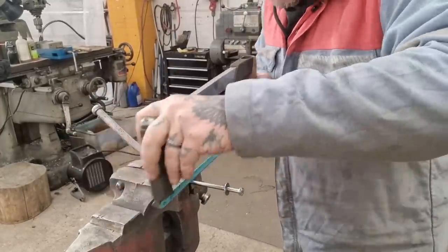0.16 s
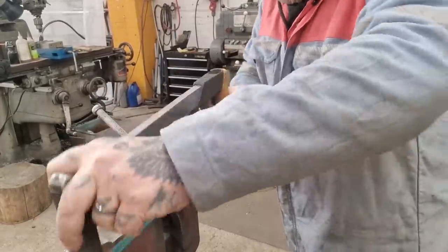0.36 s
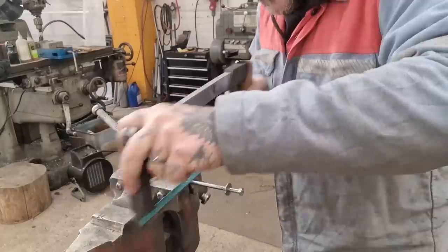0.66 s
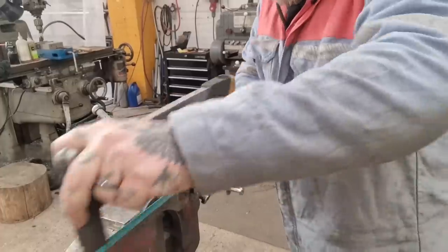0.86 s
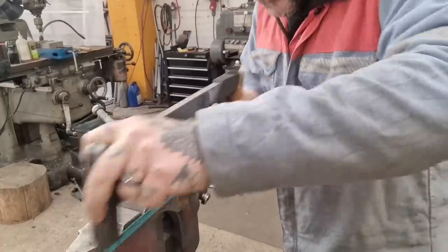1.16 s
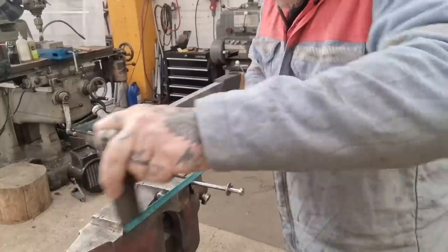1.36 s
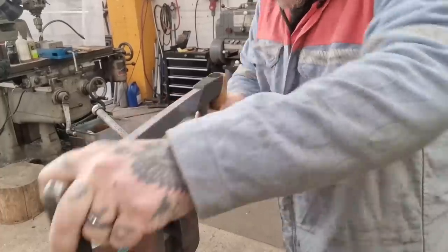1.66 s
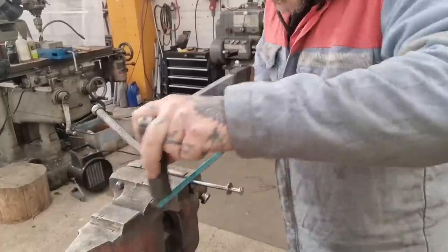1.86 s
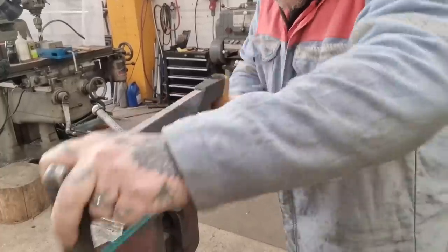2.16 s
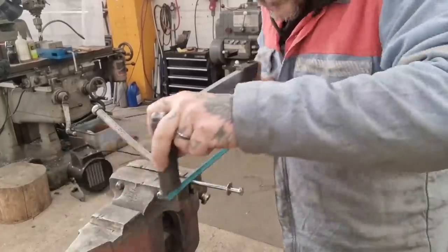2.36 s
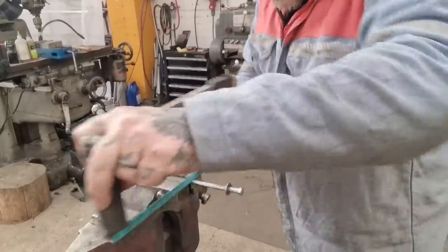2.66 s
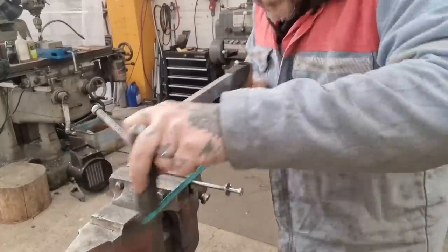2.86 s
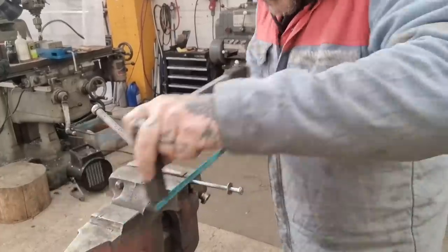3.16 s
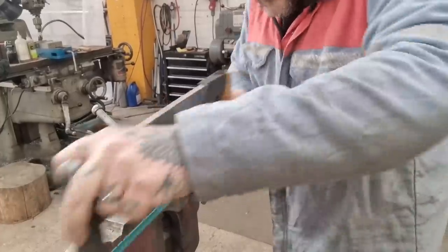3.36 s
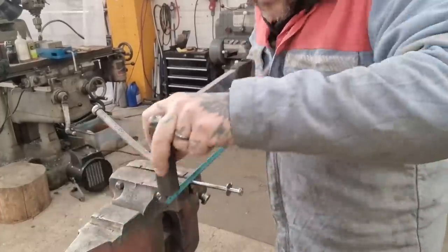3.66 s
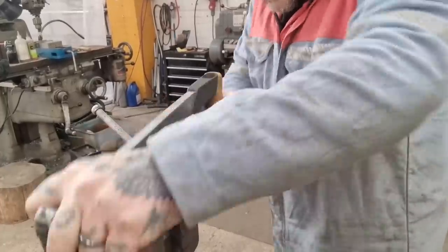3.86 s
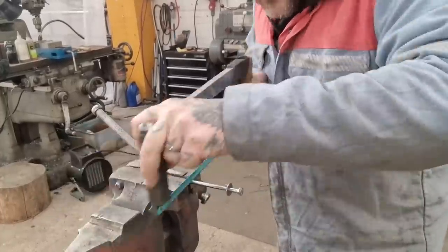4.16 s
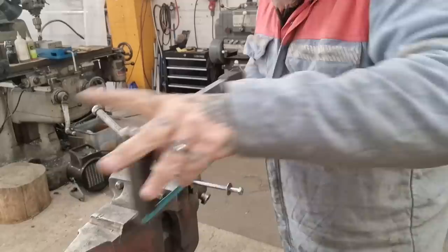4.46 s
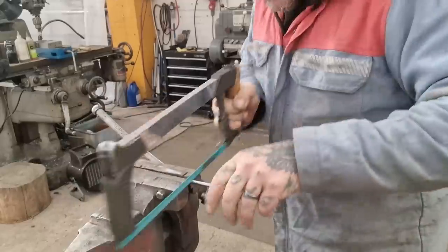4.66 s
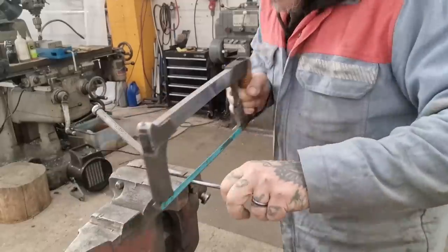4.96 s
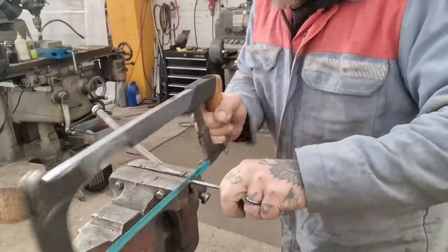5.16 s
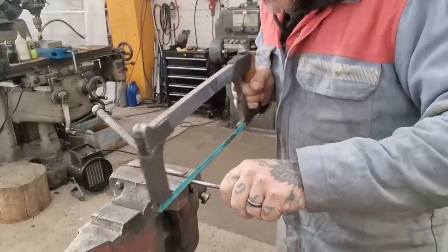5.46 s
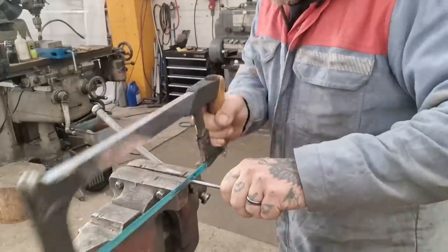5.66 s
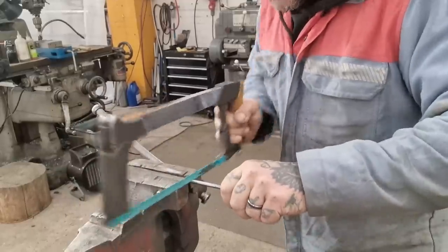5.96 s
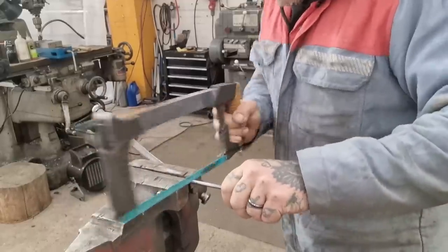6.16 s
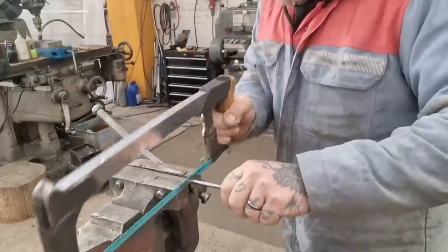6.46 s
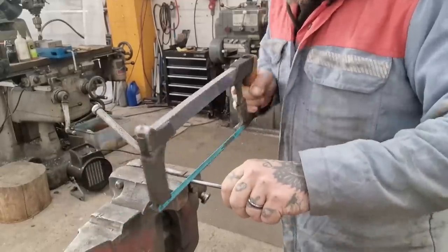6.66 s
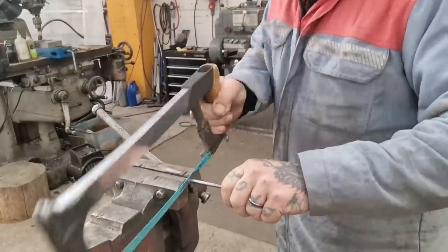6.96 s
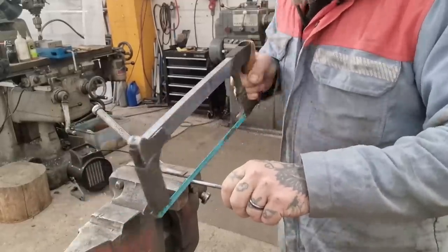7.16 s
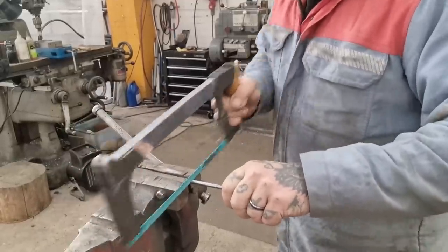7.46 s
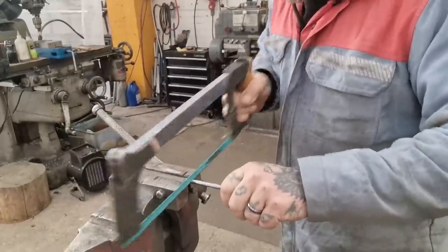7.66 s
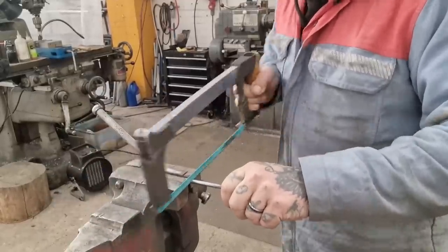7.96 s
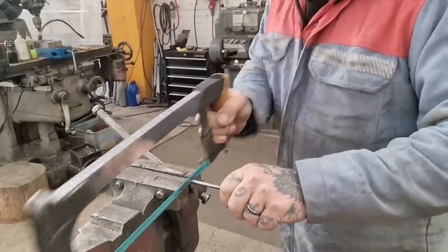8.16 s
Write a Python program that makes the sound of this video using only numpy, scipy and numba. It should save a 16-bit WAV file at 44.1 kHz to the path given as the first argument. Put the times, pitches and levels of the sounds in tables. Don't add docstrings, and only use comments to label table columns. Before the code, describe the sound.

A hacksaw is already cutting a thin metal bolt in a bench vise, heard in stereo from an arm's length in a fairly dry workshop with faint low rumble and wandering hum. From 0 to 4.5 seconds, strong pushes come roughly every 0.43 seconds, each swelling into gritty grinding and a loud buzzing ring near 1.5 kilohertz that bends upward under pressure. Softer, raspy pulls fill between them, some with a low blade flutter. A short vise hum colours the push around 0.7; tooth tone becomes clearer from about 1.9. After 4.5 the ringing grows uneven, with high metallic flares near 4.7 and 5.2 quickly damped, and a rougher scraping edge. Snags bite sharply around 6.4, 7.3, 7.7 and 8.1. Brief high squeals sound near 6.85, 7.25 (strongest) and 7.7. Sawing continues to the end, about 8.3.

```python
import sys
import numpy as np
from scipy import signal
from scipy.fft import rfft, irfft
from scipy.io import wavfile
from scipy.ndimage import uniform_filter1d, minimum_filter1d
from numba import njit

SR = 44100
rng = np.random.default_rng(int(sys.argv[2]) if len(sys.argv) > 2 else 0)


def level_to_linear(level):
    exponent = np.asarray(level, float) / 20
    return 10 ** exponent


def unload_wav(signal):
    wavfile.write(
        sys.argv[1],
        SR,
        np.round(np.clip(np.atleast_2d(signal).T, -1, 1) * 32767).astype(np.int16),
    )


N = 366471

# start t/s, share of stroke at full pressure, grind level/dB, bolt ring level/dB, stiffening f/Hz
PUSHES = [(.147, 0.42, -21.5, -11.5, 53.7), (.601, 0.51, -21, -12.5, 70), (1.038, 0.53, -24.5, -14, 81.7),
          (1.453, 0.6, -24, -14.5, 81), (1.932, .45, -20.5, -15, 93), (2.371, 0.47, -19.5, -15.5, 96),
          (2.815, .45, -21, -15, 89.4), (3.245, 0.41, -22, -14.5, 80), (3.681, 0.41, -23.5, -15.5, 79),
          (4.132, 0.41, -24, -14, 78), (4.574, 0.4793, -26.5, -28, 30), (5.018, 0.44, -24, -12.5, 50),
          (5.45, 0.44, -27, -21.5, 10.47), (5.872, 0.49, -24, -16, 91), (6.301, 0.52, -25, -14.5, 60),
          (6.72, 0.33, -22.5, -14.5, 8.9), (7.166, 0.45, -24, -25.5, 8.9), (7.6, 0.45, -25, -14.5, 35.4),
          (8.027, .51, -24, -13.5, 9.1)]
# start t/s, share of stroke where the bolt rings most, grind level/dB, ring level/dB, flap level/dB
PULLS = [(-.06, 0.44, -29.5, -25.5, -53), (0.393, 0.56, -30, -25.5, -38.5), (.835, .4, -33, -22.5, -31),
         (1.291, 1, -29.5, -23, -27.5), (1.743, 0.61, -30, -21.5, -36), (2.184, 0.6, -31.5, -22, -50),
         (2.608, .5, -36, -21.5, -53), (3.043, 0.55, -31, -21.5, -31.5), (3.488, 0.69, -33.5, -22, -44),
         (3.944, 0.62, -31, -22.5, -30.5), (4.38, .46, -36.5, -20, -48), (4.833, .2, -37.5, -21.5, -56),
         (5.264, 0.84, -34, -32.5, -58), (5.672, .6, -31.5, -24, -38), (6.104, 0.25, -34.5, -24.5, -67),
         (6.528, 0.68, -29.5, -15.5, -57), (6.985, 0.23, -36, -23, -39), (7.404, 0.59, -32, -21.5, -29.5),
         (7.841, 0.48, -35.5, -34, -41.5), (8.27, 0.31, -24.5, -22, -50)]
LAST_S = 8.48
HAND_MOVES_S = 4.5

TOOTH_HZ = [(1340, 1000), (1240, 980)]
TOOTH_DB = [(-14, -14.5), (-20, -14.5)]
UPPER_DB = [(-0.5, -1), (-15.5, -32)]
RUB_DB = [(-64, -7), (-5, -3)]
EDGE_DB = [(-7, -26), (-7.5, -29)]
KNOT_DB = [(1.5, 3), (4.5, 4.7)]
SET_OFF_S = [(.02, .001), (.018, .001)]
TURN_GRIND_DB = [(-50.5, -52.5), (-59.5, -59)]
TURN_RING_DB = [(-42.5, -36), (-44, -41.5)]
GRIND_BLUNT = [(1.11, 1.6), (1.27, 1.74)]
GRIND_DROP_BLUNT = [(1.17, 1.22), (0.82, 1.4)]
RING_BLUNT = [(1.02, 0.7), (0.63, 0.75)]
RING_DROP_BLUNT = [(1.01, 1), (0.43, 0.49)]
GRIND_HOLD = [(.05, 0.05), (.2, 0.32)]
RING_HOLD = [(.15, 0.066), (.3, 0.024)]
RING_DROP_HOLD = [(.2, 0.046), (.33, .08)]
FLAP_HZ = [(202.2, 182), (171.3, 165)]
FLAP_TOP = [(0.552, .68), (0.525, 0.2523)]

PULL_TOP = [0.56, 0.4]
STIFFEN_LEAD = [.17, -0.02056]
FLAP_PUSH_DB = [-38, -47.5]

# f/Hz, level/dB per Hz
SHOP = [(20, -39), (45, -52), (70, 7.5), (100, -5), (160, 3.5), (250, -16), (700, -20), (2000, -19.5),
        (6000, -29), (16000, -60)]
# f/Hz, level/dB per Hz
GRIND = [(200, -37.5), (500, -11), (1200, -1.5), (2500, 1), (4800, 1.5), (6600, 2), (7600, 5.5),
         (10300, -5), (12000, -8), (14000, 0), (15800, -10)]
TOOTH_OVER = [-11.5, 0, -13, -21]
# t/s, level/dB
CLEAR = [
    (0, -10),
    (1.6, -11),
    (1.85, 0),
    (5.6, 0),
    (8.31, -13),
]
# f/Hz, width/Hz, level/dB
VISE = [(780, 22, 9.5), (992, 42.6, 12), (1920, 40, -2.5), (2165, 23, 1), (5780, 40, 15.5), (342, 5.7, 31)]
# t/s, f/Hz
REST = [(0, 1469), (4.4, 1433), (6.5, 1413), (8.31, 1387)]
# f/Hz, width/Hz, level/dB, stiffening
UPPER = [(4287, 22, 1, 1.194), (4386, 36, -6, 2), (8560, 110, 2.5, 1.26), (7340, 59, -9, 0.31),
         (14080, 200, 6, 0.3), (13260, 110, -7, 0.1), ]
# t/s, level/dB
HELD = [
    (0, -3),
    (4.5, -1.5),
    (4.66, 1),
    (4.7, 23),
    (4.735, -9),
    (5.1, -5),
    (5.17, 22),
    (5.3, -18),
    (8.31, 1.5),
]
CHATTER_DB = [-9, -11.5]
# t/s, level/dB
BITES = [(0.406, -29), (0.642, -29), (2.8511, -21.5), (3.0602, -34), (3.271, -46), (3.2936, -44),
         (3.697, -42), (3.9507, -35.5), (4.4041, -39), (4.6038, -21.5), (4.8585, -55), (5.2782, -28.5),
         (5.4813, -23.5), (5.8964, -30), (5.9195, -22), (6.1282, -37), (6.404, -13), (6.5474, -39),
         (6.768, -30), (7.0274, -18.5), (7.202, -22), (7.306, -14), (7.6344, -31), (7.6836, -14),
         (7.8699, -28), (8.126, -14), (8.3004, -21.5)]
# t/s, length/s, f/Hz, level/dB
SINGS = [
    (.725, 0.057, 980, -22),
    (6.61, 0.066, 895.5, -33),
    (7.658, 0.037, 780, -30),
]
# t/s, f/Hz, level/dB
SQUEAL = [
    [(6.823, 3902, -29), (6.857, 3898, -18), (6.887, 4040, -45)],
    [(7.226, 3795, -24), (7.25, 3820, -14.5), (7.3, 3810, -16), (7.325, 3810, -28)],
    [(7.691, 3857, -37), (7.705, 3812, -26), (7.733, 3853, -41)],
]
SQUEAL_OVER = [-8.5, -9.5]
# f/Hz, level/dB
PORT_DB = [(60, 7), (110, -7), (200, 3), (380, -2.5), (700, 3.5), (1290, 1.0), (2380, 3.5), (4400, 3.5),
           (8120, 4.5), (15000, 10)]
# f/Hz, lead/rad
PORT_LEAD = [(0, 1), (1030, 1.15), (1550, 0.5), (3530, -1.5), (3880, 0.73), (4570, 1.5), (6550, -3),
             (7670, -1.5), (8960, 7.0), (10400, 10.5), (13700, 3.5), (14000, 19.5), (14700, -36.5),
             (15700, 6)]


def unit(x):
    return x / np.sqrt(np.mean(np.abs(x) ** 2))


def curve(rows):
    s, *cols = np.transpose(rows)
    return [np.interp(np.arange(N) / SR, s, c) for c in cols]


def shape(x, rows):
    hz, db = np.transpose(rows)
    f = np.log(np.fft.rfftfreq(N, 1 / SR) + 1)
    return irfft(rfft(x) * level_to_linear(np.interp(f, np.log(hz), db)), N)


def walk(rate):
    k = int(SR / rate)
    steps = np.repeat(rng.standard_normal(N // k + 1), k)
    return 1.3 * uniform_filter1d(uniform_filter1d(steps, k), k)[:N]


@njit
def mode(x, hz, width):
    y, z, r = np.empty(len(x), np.complex128), 0j, np.exp(-np.pi * width / SR)
    for i in range(len(x)):
        z = z * r * np.exp(2j * np.pi * hz[i] / SR) + (1 - r) * x[i]
        y[i] = z
    return y


def ring(hz, width):
    hz = hz + np.zeros(N)
    once = mode(rng.standard_normal(N) + 0j, hz, 1.47 * width)
    return unit(mode(once, hz, 1.47 * width))


def swing(hz, width, steady):
    locked = np.exp(2j * np.pi * np.cumsum(hz + np.zeros(N)) / SR)
    return np.sqrt(steady) * locked + np.sqrt(1 - steady) * ring(hz, width)


def overtones(z, over_db, size):
    turn = z / (np.abs(z) + 1e-9)
    over = sum(level_to_linear(db) * (z * turn ** (k + 1)).real for k, db in enumerate(over_db))
    return np.sqrt(2) * (z.real + size * over)


def patchy(x, patch_db, size):
    spec = signal.stft(x, nperseg=512)[2]
    field = rng.standard_normal(spec.shape[-2:])
    for axis in (0, 1):
        for _ in range(2):
            field = uniform_filter1d(field, size[axis], axis=axis)
    return signal.istft(spec * level_to_linear(patch_db * unit(field)), nperseg=512)[1][..., :N]


def arch(share, top, peak_db, start_db, end_db, blunt, hold):
    rising = share < top
    away = np.where(rising, 1 - share / top, (share - top) / (1 - top))
    drop_db = peak_db - np.where(rising, start_db, end_db)
    return peak_db - drop_db * np.clip((away - hold) / (1 - hold), 0, 1) ** blunt


def shop():
    mid, side = (shape(rng.standard_normal(N), SHOP) for _ in range(2))
    side = side - 1.08 * shape(side, [(150, -2.5), (500, -11)])
    hum_hz, hum_db = 73.8, -45
    hum = swing(hum_hz, 11.2, 0.1).real * level_to_linear(hum_db + 4.0 * walk(2.5))
    return level_to_linear(-44) * (mid + np.outer([.7, -.7], side)) / np.std(mid) + hum


def room(x):
    t60_s, wet_db = .2, -13
    t = np.arange(int(.5 * SR)) / SR
    fade = np.exp(-np.log(1000) * t / t60_s) * (t > .003)
    tails = rng.standard_normal((2, len(t))) * fade
    wet = signal.fftconvolve(x, tails / np.sqrt(np.sum(tails[0] ** 2)), axes=1)[:, :N]
    return level_to_linear(wet_db) * shape(wet, [(150, -9.0), (600, 4.5), (4000, 3.5), (16000, -6)])


def strokes():
    start, top, grind_db, ring_db, last = np.transpose(sorted(PUSHES + PULLS))
    pull = 1 - np.arange(len(start)) % 2
    hand = (start > HAND_MOVES_S).astype(int)
    t = np.arange(N) / SR
    k = np.clip(np.searchsorted(start, t) - 1, 0, None)
    since_s = t - start[k]
    share = since_s / np.diff([*start, LAST_S])[k]
    top = np.clip(top, .1, .9)

    def habit(rows, kind=pull):
        return np.array(rows, float)[hand, kind][k]

    def after(rows):
        return habit(rows, 1 - pull)

    def eased(rows):
        return uniform_filter1d(habit(rows), size=1500)

    press_top = np.where(pull, np.take(PULL_TOP, hand), top)[k]
    blunt = np.where(share > press_top, habit(GRIND_DROP_BLUNT), habit(GRIND_BLUNT))
    grind = arch(share, press_top, grind_db[k], habit(TURN_GRIND_DB), after(TURN_GRIND_DB),
                 blunt, habit(GRIND_HOLD))

    falling = share > top[k]
    blunt = np.where(falling, habit(RING_DROP_BLUNT), habit(RING_BLUNT))
    hold = np.where(falling, habit(RING_DROP_HOLD), habit(RING_HOLD))
    ringing = arch(share, top[k], ring_db[k], habit(TURN_RING_DB), after(TURN_RING_DB), blunt, hold)

    stiffen_share, relax_s = .26, .06
    ramp = np.clip((share - top[k] + np.take(STIFFEN_LEAD, hand)[k]) / stiffen_share, 0, 1)
    relaxing = np.roll(last, 1)[k] * (k > 0) * np.exp(-since_s / relax_s)
    stiff_hz = np.where(pull[k], relaxing, last[k] * ramp)

    idle_db, slack_hz, flap_t60_s = -59.5, 29.77, 0.31
    flap_peak_db = np.where(pull, last, np.take(FLAP_PUSH_DB, hand))[k]
    flap_amp = level_to_linear(arch(share, habit(FLAP_TOP), flap_peak_db, idle_db, idle_db, 1.18, 0))
    fade = np.exp(-np.log(1000) / (flap_t60_s * SR))
    flap_hz = habit(FLAP_HZ) - slack_hz * np.abs(share - habit(FLAP_TOP))

    rise_s = 0.13
    speed = np.sin(np.pi / 2 * np.clip((since_s - habit(SET_OFF_S)) / rise_s, .1, 1.7))
    return dict(
        grind=level_to_linear(grind),
        ringing=level_to_linear(ringing + eased(KNOT_DB) * walk(35)),
        ring_hz=curve(REST)[0] + 1.25 * stiff_hz,
        flap=signal.lfilter([1 - fade], [1, -fade], flap_amp) + flap_amp,
        flap_hz=uniform_filter1d(flap_hz, size=1500),
        rate_hz=habit(TOOTH_HZ) * speed,
        tooth_db=eased(TOOTH_DB), upper_db=eased(UPPER_DB), rub_db=eased(RUB_DB), edge_db=eased(EDGE_DB))


def blade_flap(size, hz):
    return size * swing(hz, 20.4, 0.32).real * level_to_linear(1.46 * walk(9))


def teeth(rate_hz, tooth_db):
    phase = np.cumsum(rate_hz * (1 + .025 * walk(120))) / SR
    gate = .5 + np.exp(-(phase % 1) / 0.32)
    chips = level_to_linear(5.0 * np.minimum(rng.exponential(size=N), 4)) * (rng.random(N) < .05)
    shared, own = rng.standard_normal(N), rng.standard_normal((2, N))
    grit = shape((shared + 1.5 * own) * gate * (1 + .5 * chips), GRIND)
    grit = patchy(grit, patch_db=4.5, size=(2, 7))
    grit = unit(patchy(grit, patch_db=2.5, size=(9, 3)))

    heard = np.clip((rate_hz - 520) / 250, 0, 1)
    tone = heard * sum(level_to_linear(tooth_db + db + 3.3 * walk(35)) * np.sin(2 * np.pi * (k + 1) * phase)
                       for k, db in enumerate([0, *TOOTH_OVER]))
    push = grit.mean(axis=0) + tone + 0j
    vise = sum(level_to_linear(db) * mode(push, np.full(N, 1. * hz), 1. * w).real for hz, w, db in VISE)
    return grit + tone + vise


def bolt(ring_db, ring_hz, press, upper_db):
    (rest_hz,), (held_db,) = curve(REST), curve(HELD)
    hard = np.clip((ring_db + 35.5) / 18, 0, 1)
    steady = np.clip(0.043 + 0.89 * hard, 0, .98)
    first = swing(ring_hz * (1 + 0.004047 * walk(70)), 55.8, steady) * level_to_linear(1.76 * walk(50))
    load = uniform_filter1d(np.clip(ring_hz / rest_hz - 1, 0, .08) * hard, size=900)

    cross = ring(rest_hz * (.97 - 0.65 * load), 28.0) * level_to_linear(-12.5 + 60 * load + 5.2 * walk(30))

    sag = (rest_hz / rest_hz[0]) ** .5
    upper = 0
    for hz, width, db, stiff in UPPER:
        level = level_to_linear(db + 3.5 * walk(25.115) + held_db * (hz > 6000))
        loaded_hz = hz * sag * (1 + (stiff + 0.36 * walk(90)) * load)
        upper = upper + level * ring(loaded_hz, 1. * width).real

    swell = hard * (0.088 + 14 * load) * level_to_linear(4.6 * walk(40))
    chatter = level_to_linear(ring_db) * overtones(first + 0.51 * cross, CHATTER_DB, swell)
    return chatter + press * level_to_linear(upper_db - 60 * load) * upper


def wall_rub(rub):
    return rub * level_to_linear(3.7 * walk(30)) * ring(3830 * (1 + 0.012 * walk(3)), 180).real


def tip_fizz(press, edge_db):
    return press * level_to_linear(edge_db + 4.0 * walk(24)) * ring(12940, 1600).real


def catches():
    fade_s = 0.017
    kicks = np.zeros(N)
    s, db = np.transpose(BITES)
    kicks[(s * SR).astype(int)] = level_to_linear(db - 11.0)
    return signal.lfilter([1], [1, -np.exp(-1 / (fade_s * SR))], kicks)


def vise_sings():
    t = np.arange(N) / SR
    out = np.zeros(N)
    for s, span, hz, db in SINGS:
        swell = np.exp(-8 * ((t - s) / span) ** 2)
        out += level_to_linear(db) * swell * np.sin(2 * np.pi * hz * (t - s) * (1 + 0.46 * (t - s)))
    return out


def whistles():
    out = np.zeros(N)
    for call in SQUEAL:
        (first_s, first_hz, _), (last_s, last_hz, _) = call[0], call[-1]
        hz, db = curve([(first_s - .012, first_hz, -90), *call, (last_s + 0.02, last_hz, -90)])
        out += level_to_linear(db) * overtones(swing(hz, 45.0, 0.885), SQUEAL_OVER, 0.86)
    return out


def scene():
    stroke = strokes()
    jolts = catches()
    press = stroke["grind"] + jolts
    answer_s = 0.0055
    jolted = level_to_linear(10) * uniform_filter1d(jolts, int(answer_s * SR))
    ring_db = 20 * np.log10(stroke["ringing"] + jolted)

    flap = blade_flap(stroke["flap"], stroke["flap_hz"])
    saw = level_to_linear(1.0) * press * teeth(stroke["rate_hz"], stroke["tooth_db"] + curve(CLEAR)[0])
    saw = saw + bolt(ring_db, stroke["ring_hz"], press, stroke["upper_db"])
    saw = saw + wall_rub(press * level_to_linear(stroke["rub_db"])) + whistles()
    saw = saw + flap + vise_sings()
    saw = saw + tip_fizz(press, stroke["edge_db"])

    f = np.fft.rfftfreq(N, 1 / SR)
    lead = np.interp(f, *np.transpose(PORT_LEAD)) * np.clip(f / 700 - .4, 0, 1)
    tilt = level_to_linear(np.interp(f, *np.transpose(PORT_DB)) / 2) * np.exp(.5j * lead)
    near = irfft(rfft(saw + room(saw)) * np.array([tilt, 1 / tilt]), N)
    return near + shop()


def top_cut(x):
    return signal.sosfilt(signal.butter(12, 16070, fs=SR, output="sos"), x)


def record(dry):
    limit, window = 0.98, 441
    gain = np.minimum(1, limit / (np.abs(dry).max(axis=0) + 1e-9))
    gain = uniform_filter1d(minimum_filter1d(gain, size=window), size=window)
    return top_cut(dry * gain)


dry = scene()
out = record(dry)
unload_wav(out)
```